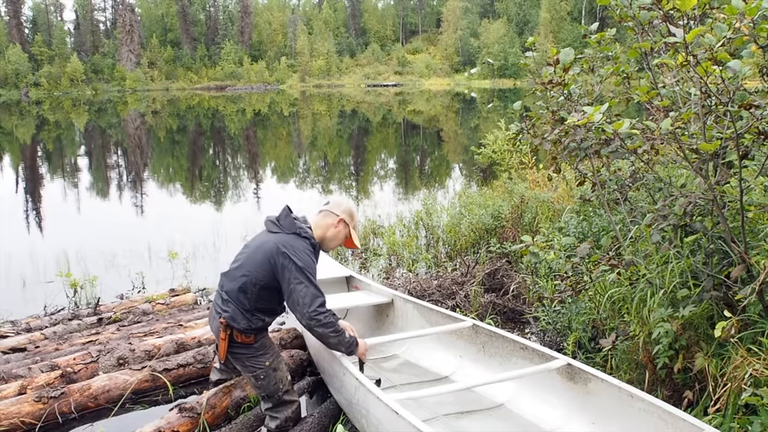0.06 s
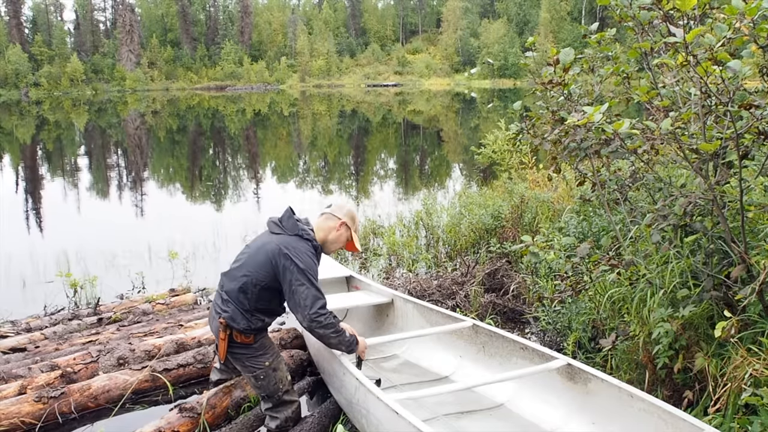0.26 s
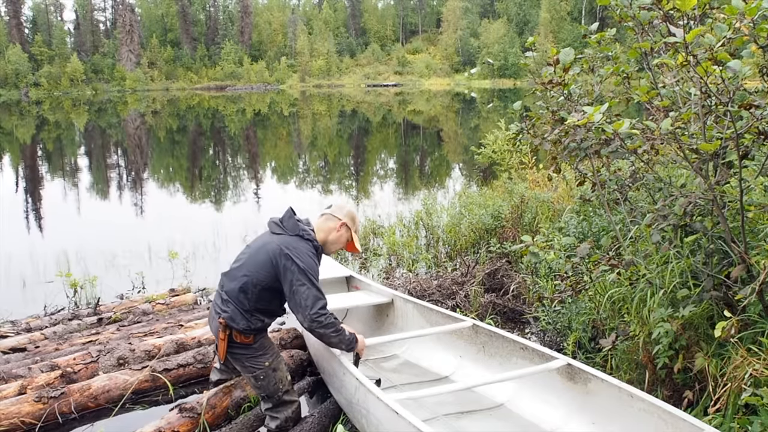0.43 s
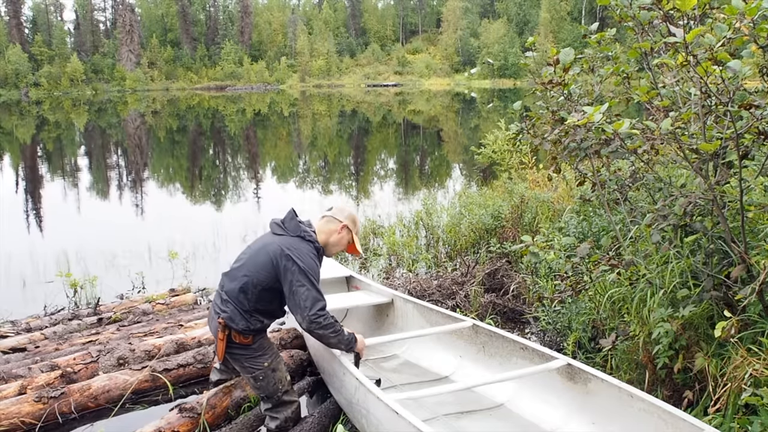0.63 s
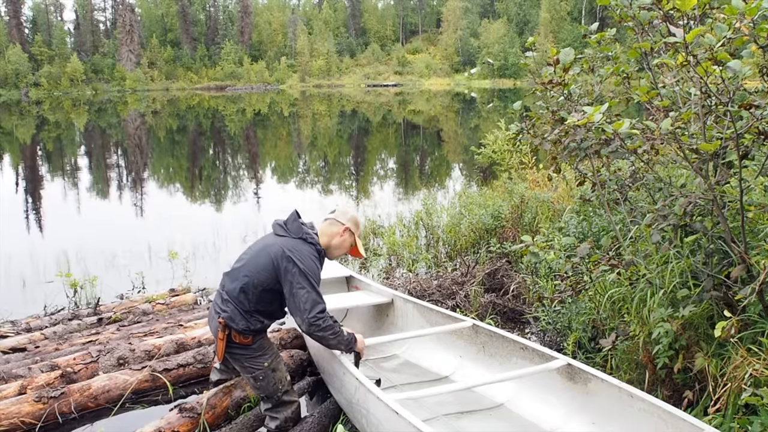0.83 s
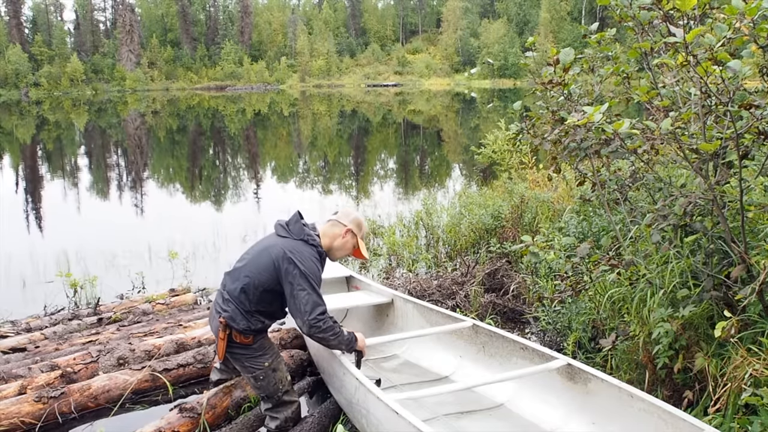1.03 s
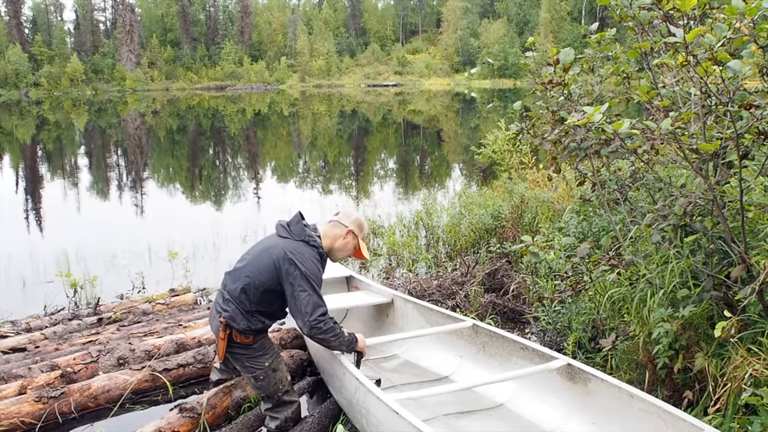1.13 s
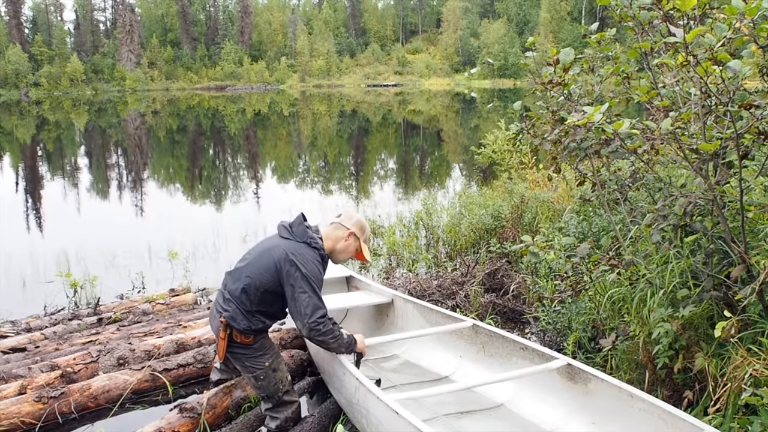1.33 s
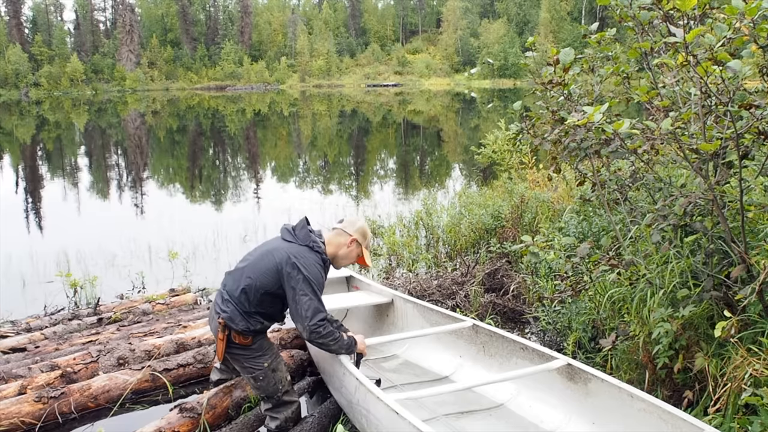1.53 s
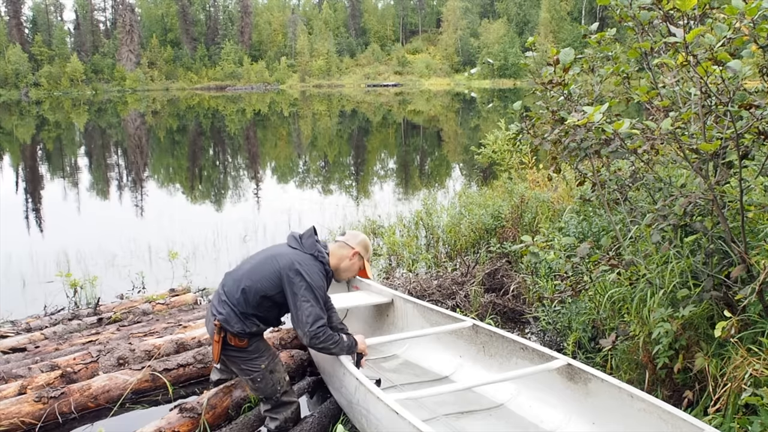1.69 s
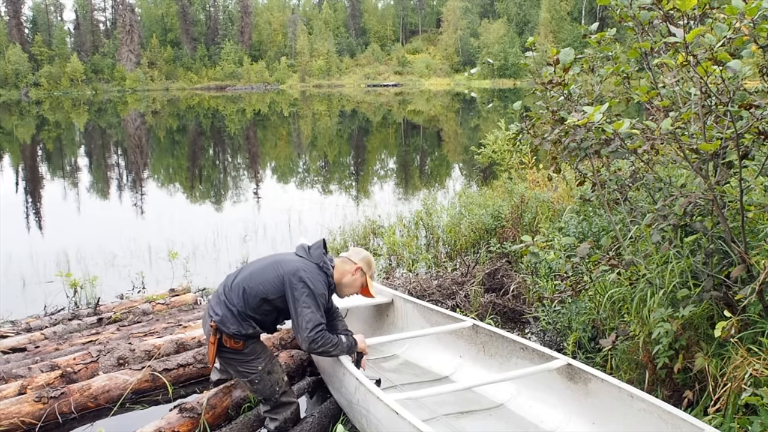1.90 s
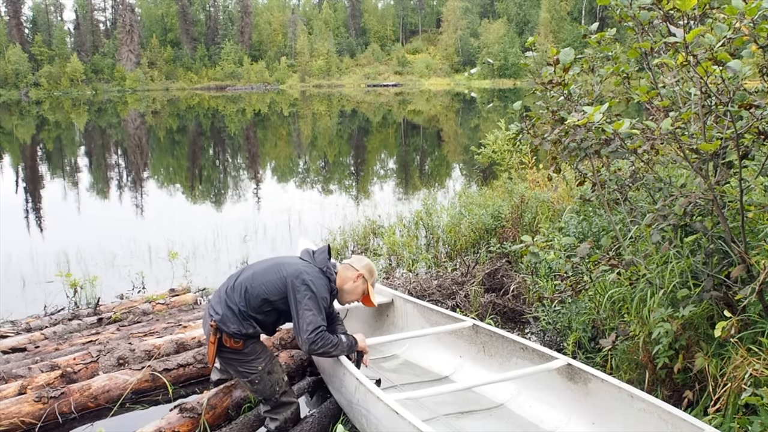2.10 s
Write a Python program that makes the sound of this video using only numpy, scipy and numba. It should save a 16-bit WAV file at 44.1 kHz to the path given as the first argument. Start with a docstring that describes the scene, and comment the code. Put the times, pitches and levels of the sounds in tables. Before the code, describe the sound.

An aluminium canoe is knocked: a light double rap at 0.12 s, then a loud, bright clank with chatter around 0.25 s, ringing hollow and tinny. Smaller taps follow near 0.5 s, duller, rounder knocks at 0.63-0.74 s, and barely audible thuds until 1.1 s. Faint steady outdoor hiss remains, with soft jacket rustle and tiny dry ticks from about 1.4 s, strongest near 1.63 s.

```python
"""Quiet lakeshore: an aluminium canoe is knocked, clanked and tapped, with faint dull thuds as it rocks on logs.
Each blow rings one thin shell: strong sine modes of hull and rail over a dense noise wash of plate modes.
A jacket rustles (crinkled filtered noise), most after the blows, with small dry noise ticks.
Steady filtered noise is the air; gain control ducks everything after loud peaks, then recovers slowly."""
import sys
import numpy as np
from scipy import signal
from scipy.fft import rfft, irfft
from scipy.io import wavfile
from scipy.ndimage import uniform_filter1d
from numba import njit

SR = 44100
rng = np.random.default_rng(int(sys.argv[2]) if len(sys.argv) > 2 else 0)


def master(y):
    """Save y as 16-bit WAV."""
    cut = np.clip(np.atleast_2d(y).T, -1, 1)
    pcm = np.round(cut * 32767)  # scale
    wavfile.write(sys.argv[1], SR, pcm.astype(np.int16))


N = 94815


def undb(db):
    """Decibels to amplitude gain."""
    return 10 ** (np.asarray(db) / 20)


def at(table, hz, column=1):
    """One table column, interpolated over log frequency."""
    rows = np.array(table, float)
    return np.interp(np.log(hz + 1e-9), np.log(rows[:, 0]), rows[:, column])


def stereo(mid, side):
    """Left and right from mid and side."""
    return np.array([mid + side, mid - side])


def hiss(table):
    """Stereo Gaussian noise shaped to a tabulated spectrum and width."""
    hz = np.arange(N // 2 + 1) * SR / N
    white = rfft(rng.standard_normal((2, N)))
    mid, side = white * undb(at(table, hz)) * np.sqrt(SR / 2)
    side = side * undb(at(table, hz, column=2))
    return irfft(stereo(mid, side), N)


# Air and microphone hiss spectrum: [f/Hz, relative density/dB, side re mid/dB]
AIR_SPECTRUM = [(25, -4, -20), (70, 1.5, -10), (110, 3, -10), (170, 1.5, -3), (222, 8, -5.5), (292, 1.5, 0),
                (350, 7, 0), (435, 3, -6), (574, -4.5, -2), (650, 0, -4), (1590, -5, 0), (2120, -10, -1),
                (2500, -7, 1), (4320, -9, 0.5), (5130, -16, -0.5), (8700, -12, 0), (15700, -17, 0.5)]
AIR_DB = -81.5


def air():
    """Lakeside air and microphone hiss: stationary broadband noise."""
    return undb(AIR_DB) * hiss(AIR_SPECTRUM)


# Sleeve movement: [t/s, relative level/dB]
SLEEVE_LEVEL = [(0, -9), (1.25, -24), (1.42, -6), (1.5, -6), (1.57, -2), (1.63, 3), (1.69, 1), (1.74, -3.5),
                (1.84, -4.5), (2.0, -10), (2.15, -6.5)]
# Cloth friction spectrum: [f/Hz, relative density/dB, side re mid/dB]
CLOTH_SPECTRUM = [(150, -22, -28), (350, 4.5, -10), (510, -4.5, -10), (710, -2.5, -19), (1500, -0.5, -10),
                  (2110, -2, -11), (2350, 0.5, -11), (4270, -5, -1), (5150, -11.5, -3.5), (9900, -10, 0.5),
                  (15500, -15, -1)]
CLOTH_DB, CRINKLE_DEPTH, CRINKLE_S = -80, 0.15, 0.0022


def jacket(t):
    """Cloth sliding on cloth: friction noise, crinkling unevenly as the arm moves."""
    grain = uniform_filter1d(rng.standard_normal(N), max(2, int(CRINKLE_S * SR)))
    crinkle = np.exp(CRINKLE_DEPTH * grain / grain.std())
    level_db = CLOTH_DB + np.interp(t, *np.array(SLEEVE_LEVEL).T)
    return hiss(CLOTH_SPECTRUM) * undb(level_db) * crinkle


def contact(hz, bass_hz, treble_hz, bass_order=1.53, treble_order=3.2):
    """Contact response: small and hard feeds little bass, broad and soft little treble."""
    bass_loss = 1 + (bass_hz / hz) ** (2 * bass_order)
    treble_loss = 1 + (hz / treble_hz) ** (2 * treble_order)
    return 1 / np.sqrt(bass_loss * treble_loss)


# Dense plate modes: [f/Hz, relative density/dB, t60/s]
PLATE_MODES = [(80, -24, 0.48), (116, 0.5, 0.85), (214, -3, 0.93), (302, -7, 0.62), (518, -3, 0.47),
               (524, -12, 0.66), (790, -3, 0.29), (1560, -5, .24), (2080, -8, 0.19), (3170, -6.5, 0.19),
               (3600, -18.5, 0.14), (4600, -17.5, 0.18), (4950, -21.5, 0.15), (6140, -17.5, 0.081),
               (9100, -26.5, 0.13), (14900, -33, .07)]
# Out-of-step share of the ring at the two microphones: [f/Hz, side level/dB]
RING_SPREAD = [(100, -34), (500, -22.5), (1300, -11.5), (3000, -9.5), (6000, -10), (11000, 6)]
PLATE_DB = -37
CRACK_DB, CRACK_S = -1.5, 0.0088  # extra burst at contact: level, decay constant


def plate(bass_hz, treble_hz, size=32768, edge_count=27):
    """Overlapping plate modes as random-phase noise, each band decaying at its own rate."""
    t = np.arange(size) / SR
    hz = (np.arange(size // 2 + 1) + .5) * SR / size
    mid, side = np.exp(2j * np.pi * rng.random((2, len(hz))))
    wash = stereo(mid, side * undb(at(RING_SPREAD, hz)))
    wash = wash * undb(at(PLATE_MODES, hz) + PLATE_DB) * contact(hz, bass_hz, treble_hz)
    wash = wash * np.sqrt(size * SR / 2)
    edges_hz = np.geomspace(45, 16000, edge_count)
    ring = 0
    for lo, hi in zip(edges_hz, edges_hz[1:]):
        t60 = at(PLATE_MODES, np.sqrt(lo * hi), column=2)
        band = irfft(wash * ((hz >= lo) & (hz < hi)))
        ring = ring + band * np.exp(-np.log(1000) * t / t60)
    return ring * (1 + undb(CRACK_DB) * np.exp(-t / CRACK_S))


MODES_DB = -2


def modes(table, bass_hz, treble_hz, size=32768, detune=0.0017):
    """Decaying sines, shifted a little by hold and strike point, each with its own stereo lean."""
    t = np.arange(size, dtype=np.float32)[None] / SR
    hz, db, t60 = np.array(table, np.float32).T[:, :, None]
    shift, lean = rng.standard_normal((2, len(hz), 1))
    phase = 2 * np.pi * (hz * (1 + detune * shift) * t + rng.random(hz.shape))
    ring = np.sin(phase.astype(np.float32)) * np.exp(-np.log(1000) * t / t60)
    pan = stereo(0.84, lean * undb(at(RING_SPREAD, hz)))
    gain = undb(db + MODES_DB) * contact(hz, bass_hz, treble_hz) * pan
    return gain[:, :, 0] @ ring


# Blows, close rows being chatter of one knock:
# [t/s, relative level/dB, contact bass cut f/Hz, contact treble cut f/Hz, push build-up/s, hull drive/dB]
CANOE_BLOWS = [ (.1225, -13, 395, 1450, 0.002, -2.5), (.1258, -14.5, 1390, 5200, 0.00038, 2),
               (0.1326, -12.5, 209, 1420, 0.0021, -2.5), (.138, -14.5, 600, 2080, .002, -2.5),
               (0.179, -21, 380, 520, 0.0012, 3), (0.245, -18, 2000, 4250, 0.0029, -18),
               (.251, -4, 806, 2350, 0.0024, -8), (.254, 0, 1040, 7000, 0.0015, -7.5),
               (.262, -5.5, 2480, 3600, 0.0013, 9), (.273, -5.5, 990, 1120, 0.0014, -10),
               (0.298, -15.5, 483, 860, .002, 2.5), (0.309, -23, 60, 153, .008, 6),
               (0.453, -19.5, 60, 169, 0.0098, 3), (0.494, -20.5, 634, 1360, 0.0023, -10),
               (.4985, -13, 1900, 3270, 0.0022, -2), (.521, -13.5, 1790, 3160, 0.002, 0),
               (.548, -28.5, 60, 132, 0.0046, 12), (0.6313, -11, 764, 1245, 0.0026, 1),
               (.639, -15, 144, 460, 0.0013, 7), (0.668, -13, 496, 486, 0.0017, 10),
               (0.69, -13.5, 130, 325, 0.0013, 3.5), (.74, -25, 400, 420, 0.0023, 9.5),
               (.922, -34, 58.7, 152, 0.0026, 6), (0.953, -40, 250, 393, 0.0065, 6),
               (1.108, -34, 128, 250, 0.0085, 9), ]
# Broad hull panel modes: [nominal f/Hz, relative level/dB, t60/s]
PANEL_MODES = [ (109.7, -16.5, 0.74), (119.7, -15.5, 1), (134.1, -16, 0.88), (147.2, -13, 0.68),
               (185.3, -8, 0.48), (252.2, -16.5, 0.56), (314, -11, 0.29), (384.2, -6, 0.26),
               (403, -16, 0.14), (416, -8.5, .4), (440.8, -10.5, 0.34), (455.1, -6.5, 0.45),
               (471.6, -12, 0.25), (512.7, -12, 0.19)]
# Bright gunwale rail and thwart modes: [nominal f/Hz, relative level/dB, t60/s]
GUNWALE_MODES = [ (645.7, -12.5, .36), (736, -20, 0.58), (794, -17, 0.3), (841, -13, 0.32),
                 (883, -16.5, 0.38), (926, -12.5, 0.23), (1216, -16.5, 0.28), (1301, -14.5, 0.31),
                 (1432, -8, 0.17), (1510, -11, 0.12), (1921, -13.5, 0.14), (2113, -12, 0.061),
                 (2575, -11, .16), (2667, -9, 0.09), (2823, -12.5, 0.15), (2810, -10, 0.081),
                 (3214, -18.5, 0.22), (3293, -12.5, 0.073), (3700, -16.5, 0.13), (4086, -15.5, 0.071),
                 (4240, -20, 0.13), (4330, -19.5, 0.099), (4784, -21.5, 0.084), (5340, -32, 0.083),
                 (5600, -33, 0.24)]
LEFT_LAG_S, LEFT_GAIN_DB = .00003, -0.48
HULL_CUT_HZ = 96  # hull radiates little below this


def canoe():
    """Each blow rings plate, rail and hull; the left microphone hears it just after the right."""
    out = np.zeros((2, 2 * N))
    for start, db, bass_hz, treble_hz, build_s, hull_db in CANOE_BLOWS:
        wash = plate(bass_hz, treble_hz)
        rail = modes(GUNWALE_MODES, bass_hz, treble_hz)
        hull = undb(hull_db) * modes(PANEL_MODES, bass_hz, treble_hz)
        ring = wash + rail + hull
        age = np.arange(ring.shape[1]) / SR
        i = int(start * SR)
        out[:, i:i + len(age)] += undb(db) * ring * (1 - np.exp(-age / build_s))
    hz = np.arange(N + 1) * SR / (2 * N)
    lag = np.exp(-2j * np.pi * hz * LEFT_LAG_S)  # sub-sample delay
    left = undb(LEFT_GAIN_DB) * irfft(rfft(out[0]) * lag)
    heard = np.array([left, out[1]])[:, :N]
    return signal.sosfilt(signal.butter(4, HULL_CUT_HZ, "high", fs=SR, output="sos"), heard)


# Dry ticks of cloth and grit: [t/s, level/dB, centre f/Hz]
DRY_TICKS = [(.634, -40.5, 5340), (1.632, -38.5, 1900), (1.68, -41, 3800), (1.793, -40, 2170),
             (1.951, -41.5, 1690)]
TICK_S = .005  # decay constant


def ticks(t, width=0.54):
    """Broadband clicks with fast exponential decay and no resonance."""
    out = 0
    for start, db, hz in DRY_TICKS:
        band = signal.butter(1, [hz / 2, min(hz * 2, SR / 2 - 1)], "band", fs=SR, output="sos")
        mid, side = signal.sosfilt(band, rng.standard_normal((2, N)))
        decay = (t >= start) * np.exp(-abs(t - start) / TICK_S)
        out = out + stereo(mid, width * side) / mid.std() * undb(db) * decay
    return out


def scene():
    """Air, jacket, canoe and ticks, summed."""
    t = np.arange(N) / SR
    return air() + jacket(t) + canoe() + ticks(t)


@njit
def follow(x, attack, release):
    """Peak follower: fast rise, slow fall (per-sample coefficients)."""
    out, e = np.empty(len(x)), 0.
    for i in range(len(x)):
        e += (x[i] - e) * (attack if x[i] > e else release)
        out[i] = e
    return out


LIMIT_DB, RATIO, ATTACK_S, RELEASE_S = -17.5, 1.478, 0.00089, 0.32
TOP_HZ = 15800


def record(dry):
    """Gain control compresses peaks above the limit and recovers slowly; low-pass at TOP_HZ."""
    attack = 1 - np.exp(-1 / (ATTACK_S * SR))
    release = 1 - np.exp(-1 / (RELEASE_S * SR))
    peak = follow(abs(dry).max(axis=0), attack, release)
    gain = np.maximum(peak / undb(LIMIT_DB), 1) ** (1 / RATIO - 1)
    return signal.sosfilt(signal.ellip(10, .1, 90, TOP_HZ, fs=SR, output="sos"), dry * gain)


dry = scene()
out = record(dry)
master(out)
```